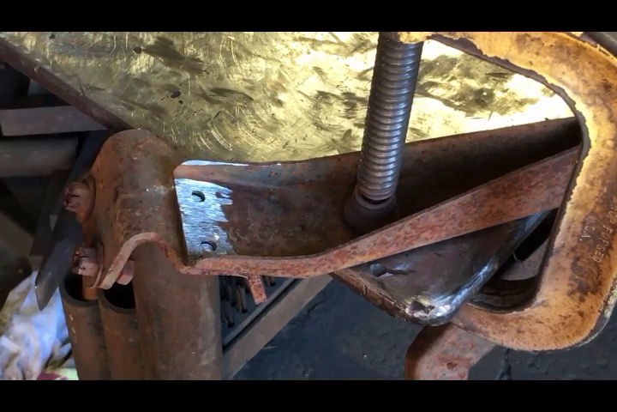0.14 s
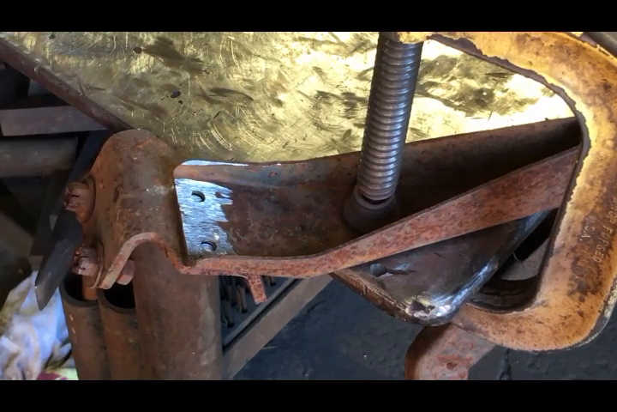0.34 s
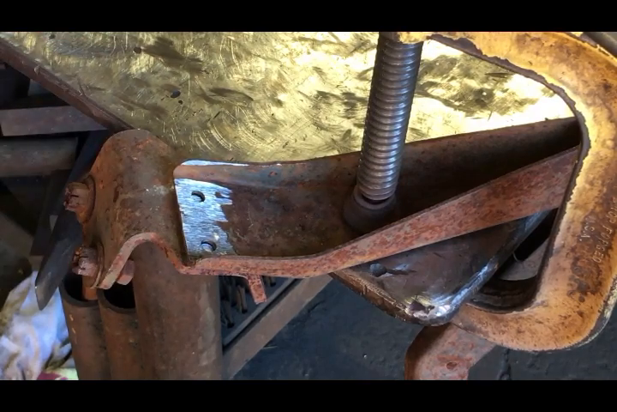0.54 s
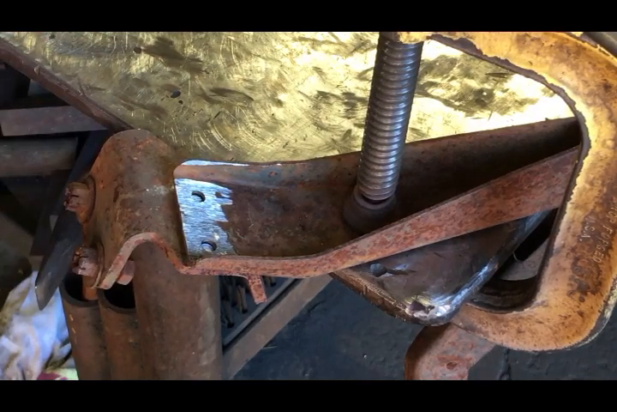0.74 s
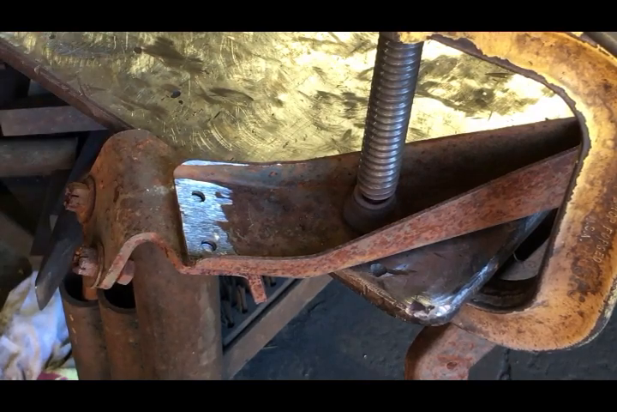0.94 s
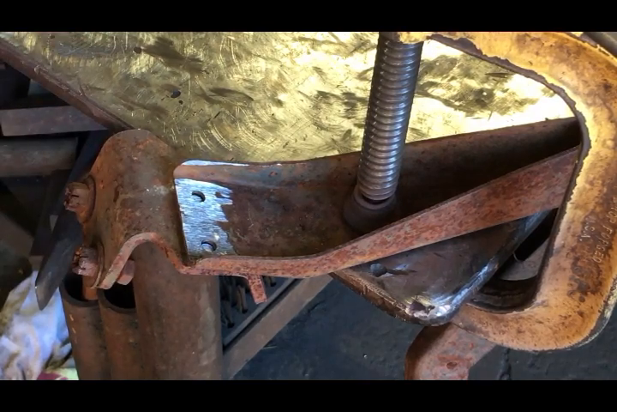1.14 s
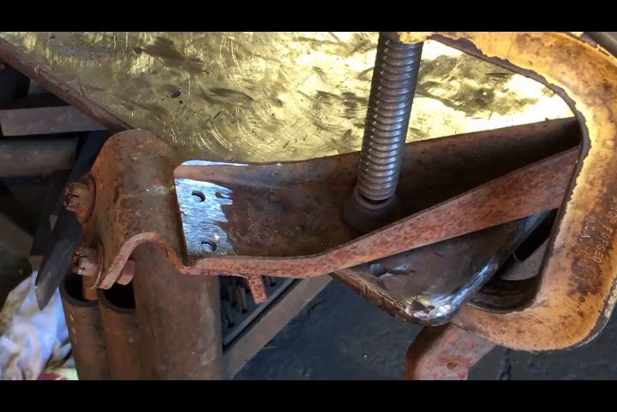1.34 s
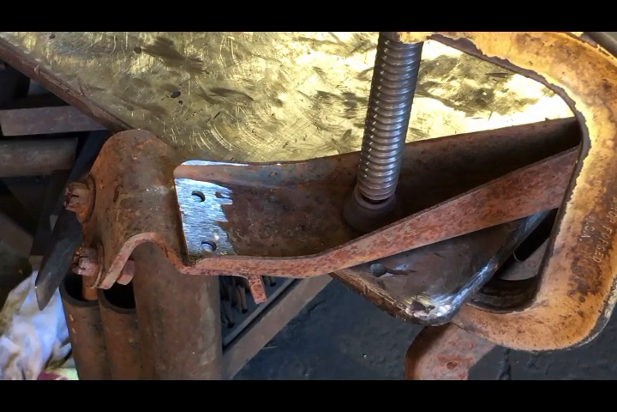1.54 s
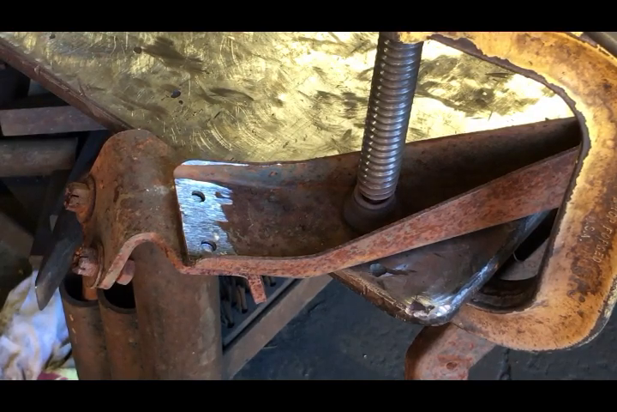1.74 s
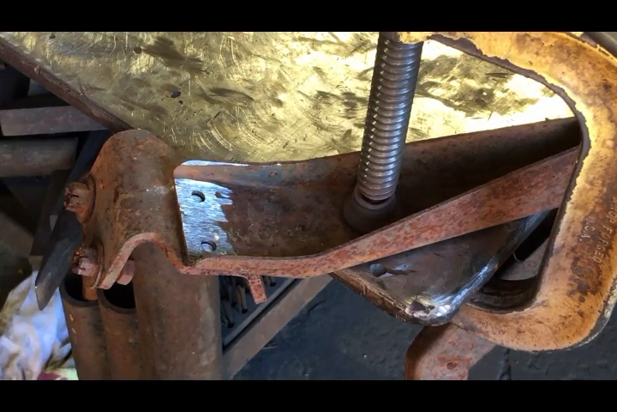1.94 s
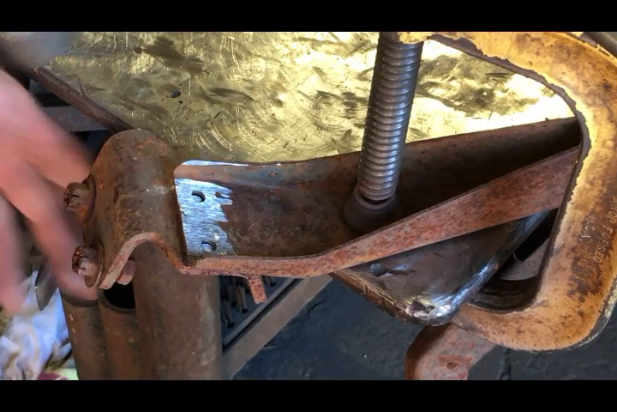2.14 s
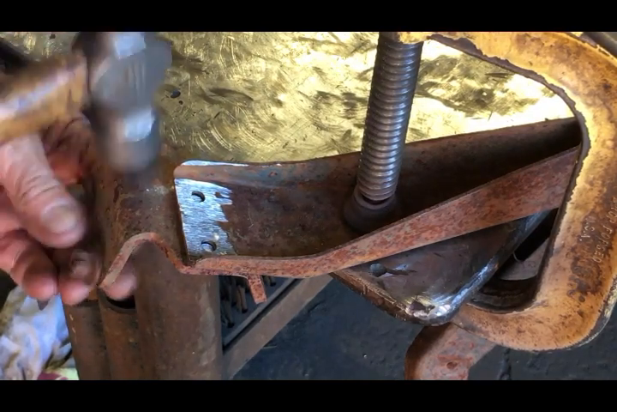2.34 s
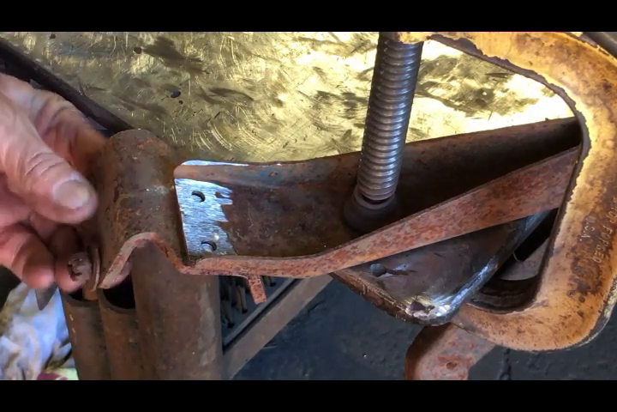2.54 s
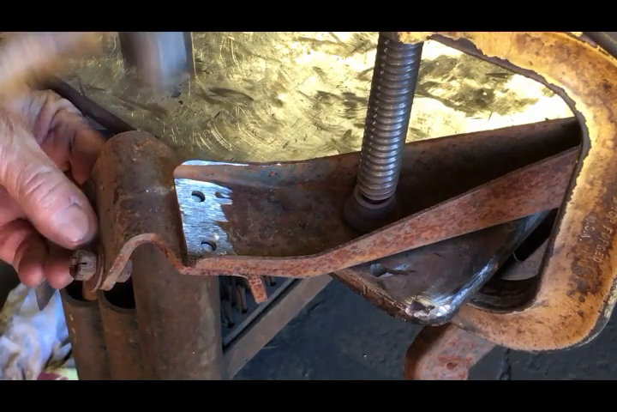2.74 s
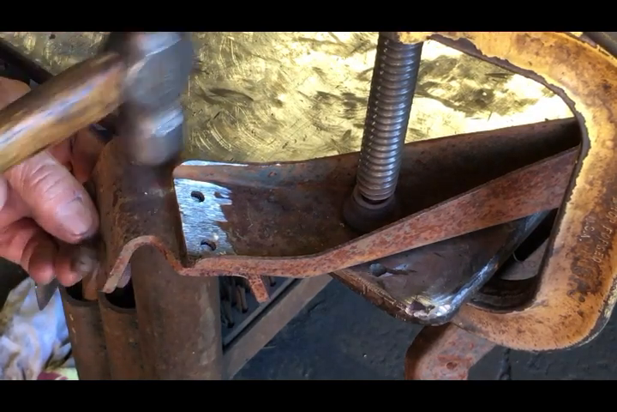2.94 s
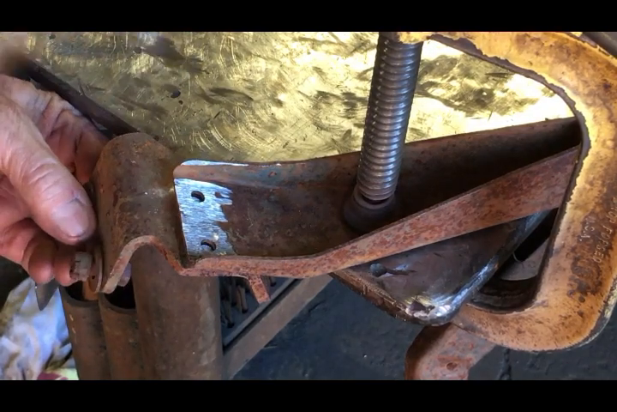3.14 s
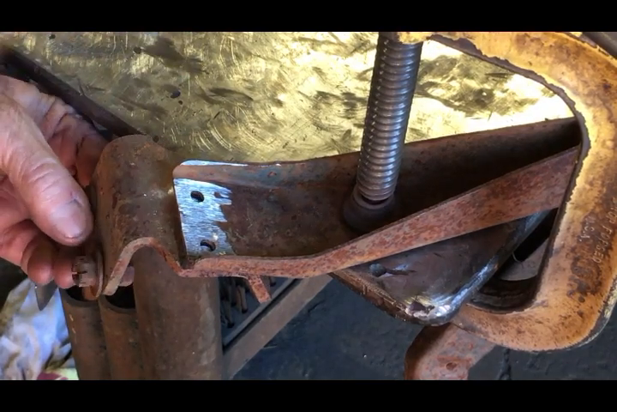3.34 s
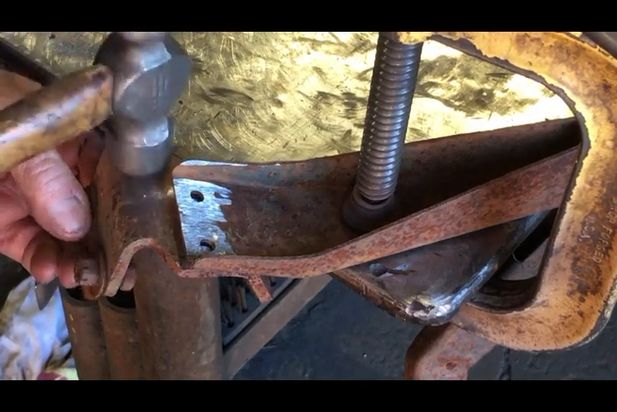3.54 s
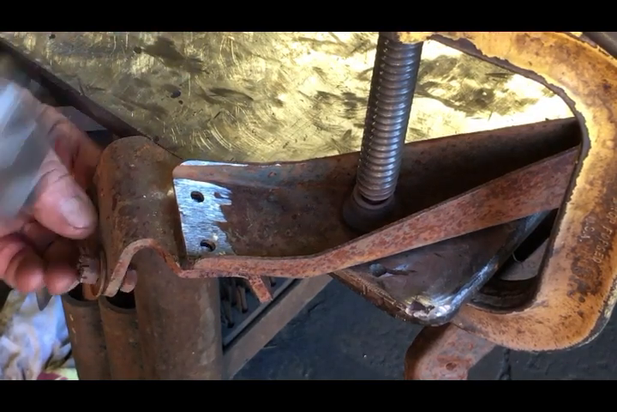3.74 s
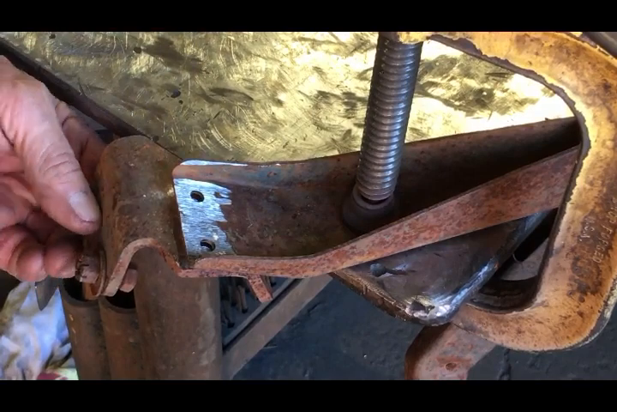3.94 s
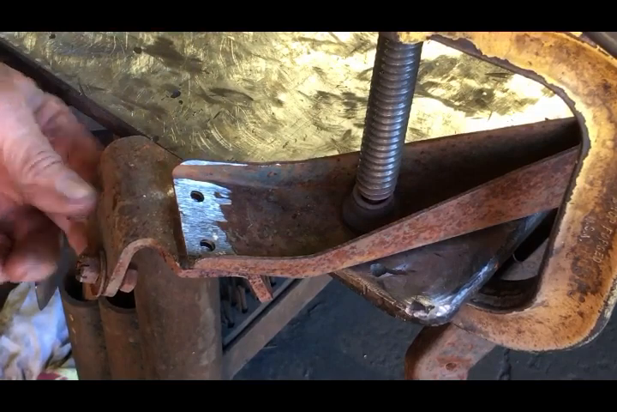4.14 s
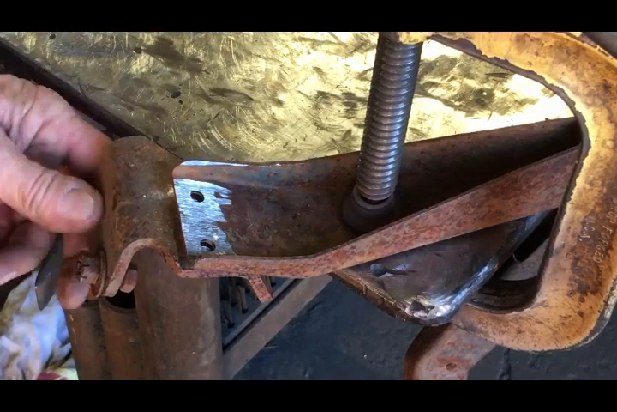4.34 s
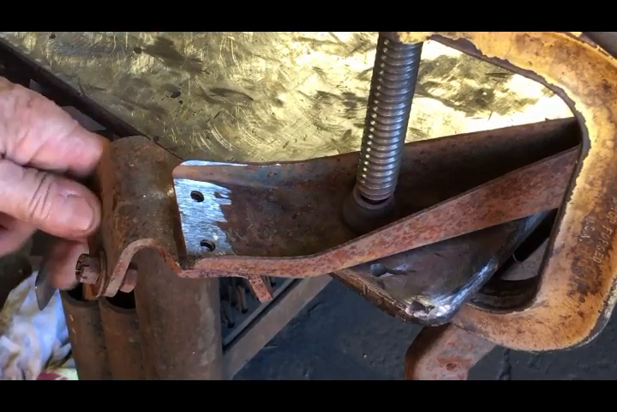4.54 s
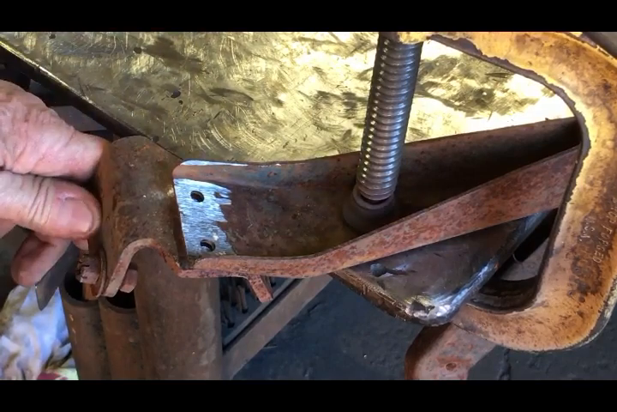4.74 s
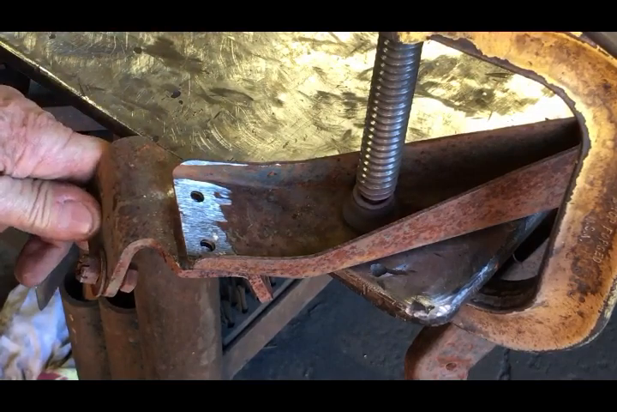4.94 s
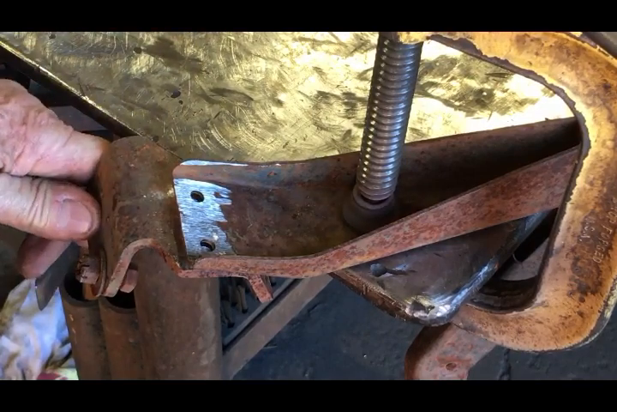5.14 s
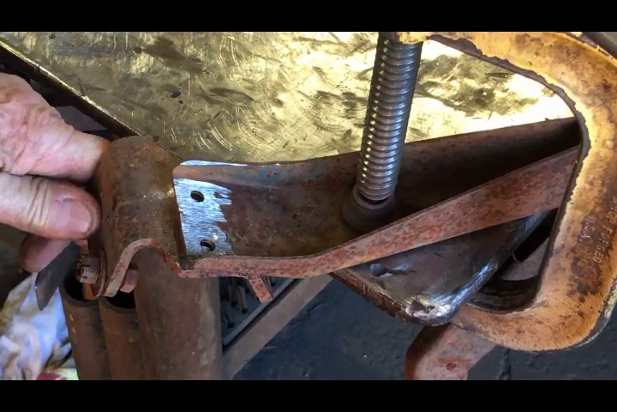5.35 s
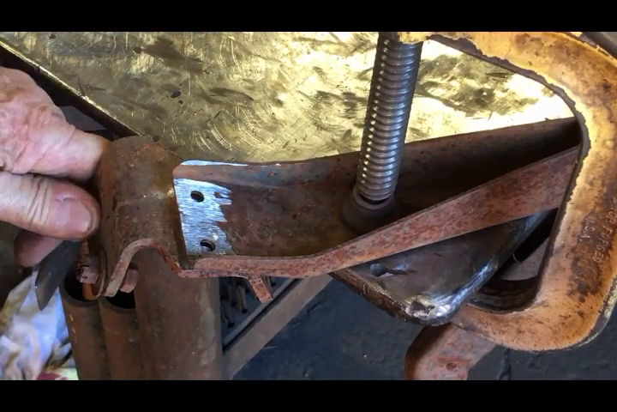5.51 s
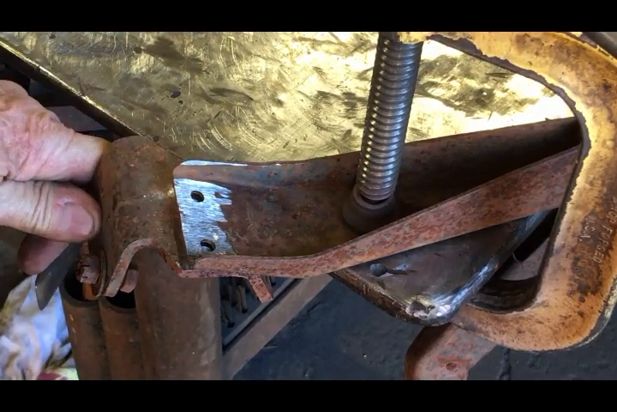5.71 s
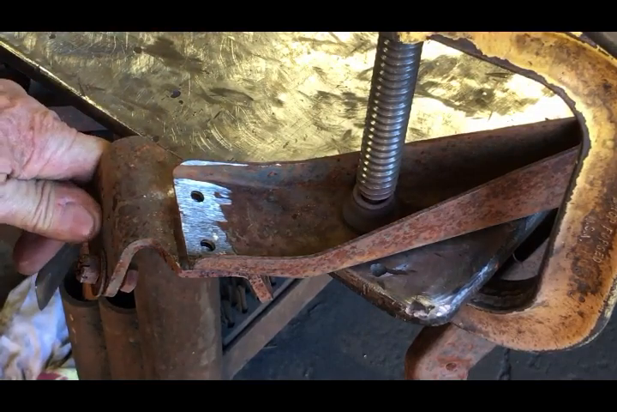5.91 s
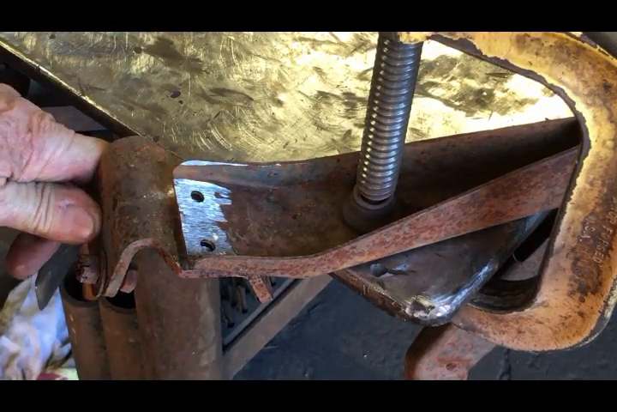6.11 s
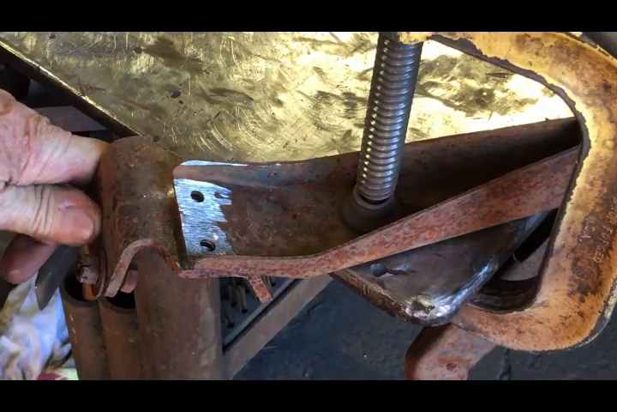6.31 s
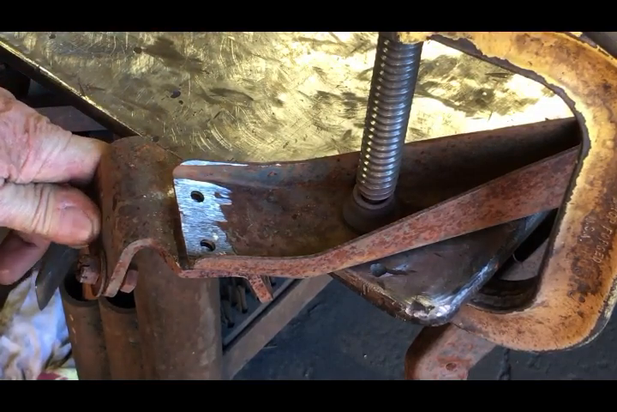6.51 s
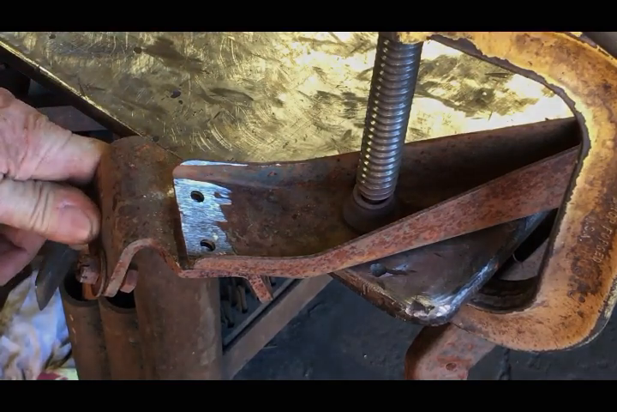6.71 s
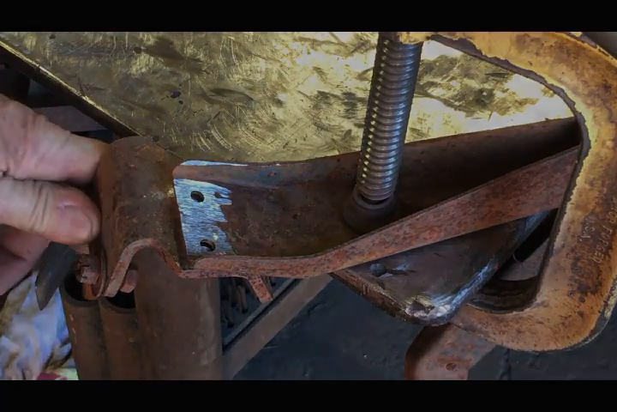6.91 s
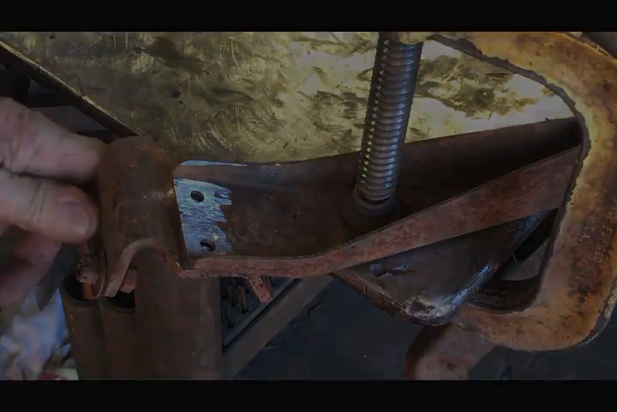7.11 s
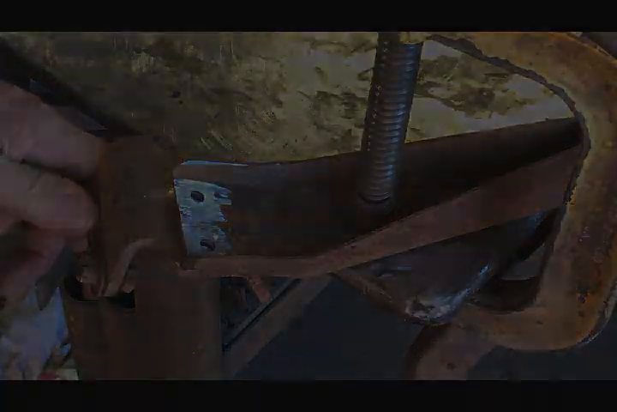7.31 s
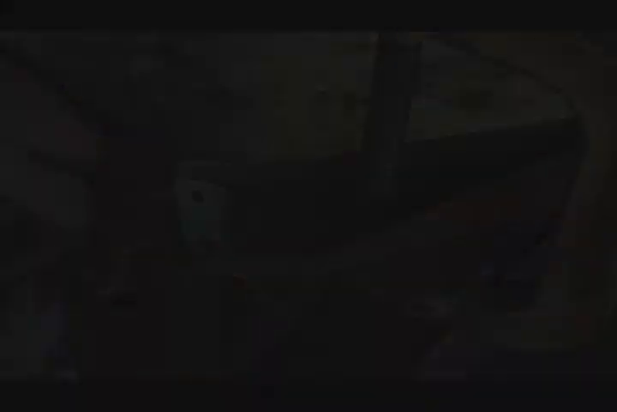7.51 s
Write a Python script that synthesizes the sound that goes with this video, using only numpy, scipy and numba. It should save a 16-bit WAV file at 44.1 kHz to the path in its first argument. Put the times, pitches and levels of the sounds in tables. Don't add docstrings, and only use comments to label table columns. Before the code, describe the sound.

A duct fan hums and rushes steadily in a workshop. A loose steel chisel knocks on the bench, bounces and rings high. Soft finger touches follow, then five loud, evenly spaced hammer blows on a rusty clamped bracket, harsh and rattling, later ones with small rebounds. The metallic ring fades into the room, leaving faint handling and fan hum. Very close phone microphone, slightly limited.

```python
import sys
import numpy as np
from scipy import signal
from scipy.fft import rfft, irfft
from scipy.io import wavfile
from scipy.ndimage import uniform_filter1d, minimum_filter1d
from numba import njit

SR = 44100
rng = np.random.default_rng(int(sys.argv[2]) if len(sys.argv) > 2 else 0)


def wrap_up_sound(samples):
    columns = np.atleast_2d(samples).T
    tamed = np.clip(columns, -1, 1)
    steps = np.round(tamed * 32767).astype(np.int16)
    wavfile.write(sys.argv[1], SR, steps)


def undo_db(level):
    steps = np.asarray(level, float) / 20
    return 10 ** steps


N = 338247


def read(table, hz):
    return np.interp(np.log(hz), np.log(np.array(table)[:, 0]), np.array(table)[:, 1])


def unit(x):
    return x / np.sqrt(np.mean(x ** 2))


def peak_one(x):
    return x / np.sqrt(2 * np.mean(x[:SR // 100] ** 2))


def fade(t, t60):
    return np.exp(-np.log(1000) * t / t60)


def resonate(x, hz, width_hz):
    return signal.lfilter(*signal.iirpeak(min(hz, .45 * SR), hz / max(width_hz, .5), SR), x)


def resonate_twice(x, hz, width_hz, second_width_hz):
    return resonate(resonate(x, hz, width_hz), hz, second_width_hz)


def fading_noise(colour, t60, length, rise_cycles):
    bands_hz = 220 * 2 ** np.arange(0, 6.3, 1 / 3)
    t = np.arange(int(length * SR)) / SR
    out = np.zeros(len(t))
    for hz in bands_hz:
        rise = (1 - np.exp(-t * hz / rise_cycles)) ** 2
        burst = rng.standard_normal(len(t)) * rise * fade(t, t60(hz))
        out += undo_db(colour(hz)) * resonate_twice(burst, hz, hz / 3, hz / 3)
    return out


def coloured(spectrum, db):
    hz = np.maximum(np.fft.rfftfreq(N, 1 / SR), 1)
    return undo_db(db) * unit(irfft(rfft(rng.standard_normal(N)) * undo_db(read(spectrum, hz)), N))


def add(out, s, sound):
    i = int(s * SR)
    out[i:i + len(sound)] += sound[:N - i]


def narrow_noises(table):
    out = np.zeros(N)
    for hz, width_hz, db in table:
        out += undo_db(db) * unit(resonate_twice(rng.standard_normal(N), hz, width_hz, 3 * width_hz))
    return out


def slow_noise(span):
    return unit(uniform_filter1d(uniform_filter1d(rng.standard_normal(N), span), span))


def fan(swell_db=0.66, flutter_db=0.85):
    # f/Hz, level per Hz/dB
    air = [(12, -59.5), (20, -31.5), (70, -3.5), (157, -2), (202, -10), (259, -12), (309, -7.5), (436, -17),
           (471, -6), (499, -18.5), (540, -15.5), (594, -20.5), (1080, -23.5), (2000, -37), (2600, -70.5),
           (4400, -120)]
    # f/Hz, level per Hz/dB
    hiss = [(1180, -31), (2000, -1.5), (2460, -4), (3370, -6.5), (4990, -12), (5540, -11.5), (7700, -16.5),
            (10900, -17.5), (12700, -23), (14400, -18), (16000, -25.5)]
    # f/Hz, width/Hz, level/dB
    duct = [(79.5, 10, -43), (108.5, 9.5, -43), (149.8, 5.2, -47.5), (172.6, 12, -42), (229.8, 12, -49),
            (297, 30, -46), (535.6, 28, -55.5)]
    # f/Hz, width/Hz, level/dB
    whine = [(471.1, 2.6, -45.5), (951, 4, -62), (10760, 30, -86.5), (14260, 30, -88.5)]
    unsteady = undo_db(swell_db * slow_noise(SR // 5) + flutter_db * slow_noise(SR // 25))
    rush = narrow_noises(duct) + coloured(air, -35)
    return unsteady * rush + narrow_noises(whine) + coloured(hiss, -58.5)


def shop(x, gap_s=.012):
    # f/Hz, t60/s
    room_t60 = [(200, 0.68), (1000, .9), (4000, 0.92), (9000, .48), (15000, 0.13)]
    tail = fading_noise(lambda hz: -1.0 * np.log2(hz / 1000), lambda hz: read(room_t60, hz),
                        length=1.2, rise_cycles=6.7)
    tail = np.append(np.zeros(int(gap_s * SR)), tail / np.sqrt(np.sum(tail ** 2)))
    return signal.fftconvolve(x, tail)[:N]


def brushes(grain_db=0.0):
    # t/s, length/s, level/dB, f/Hz, width/Hz
    strokes = [(1.058, 0.14, -60, 7000, 12000), (1.471, 0.15, -56, 1980, 3000),
               (3.948, 0.032, -46, 2500, 5000), (4.289, .035, -58, 5500, 2990),
               (4.39, 0.033, -58, 3800, 2500), (4.455, 0.024, -62, 5000, 2000),
               (7.578, 0.1, -47.5, 1990, 4950), (7.591, .15, -32, 45, 40), (7.633, .1, -51, 2670, 200),
               (7.62, .1, -62, 6000, 1200)]
    out = np.zeros(N)
    for s, length, db, hz, width_hz in strokes:
        n = int(length * SR)
        grain = undo_db(grain_db * unit(uniform_filter1d(rng.standard_normal(n), 120)))
        rub = unit(resonate(grain * rng.standard_normal(n), hz, width_hz))
        add(out, s, undo_db(db) * signal.windows.tukey(n, .6) * rub)
    return out


def scrape(start_s=1.48, end_s=1.69, level_db=-57):
    # f/Hz, width/Hz, level/dB
    tool = [(2010, 140, 2.5), (3082, 36, -8.5), (3300, 49, -8.5), (4375, 90, -11.5), (5450, 57.2, -12.5),
            (6530, 120, -10)]
    n = int((end_s - start_s) * SR)
    rub = rng.standard_normal(n) * signal.windows.tukey(n, .3)
    out = np.zeros(N)
    add(out, start_s, undo_db(level_db) * unit(sum(undo_db(db) * unit(resonate(rub, hz, w)) for hz, w, db in tool)))
    return out


def ticks(width_hz=6500):
    # t/s, peak level/dB, f/Hz, t60/s, share of bracket ring/dB
    touches = [(1.1553, -46.5, 5500, 0.019, -18.5), (2.3325, -30.5, 2997, 0.073, 1.5),
               (2.356, -30, 2805, 0.069, 2), (2.630, -36, 11500, 0.033, -11),
               (2.642, -47.5, 10000, .015, -14), (2.912, -41, 11000, 0.046, -4),
               (3.197, -45, 11020, 0.014, -11), (3.467, -42.5, 8500, 0.092, -2.5),
               (3.6918, -30, 9400, 0.016, 0), (4.766, -51.5, 6000, 0.015, -25)]
    out, t = np.zeros(N), np.arange(int(.2 * SR)) / SR
    for s, peak_db, hz, t60, ring_db in touches:
        burst = rng.standard_normal(len(t)) * fade(t, t60)
        ring = resonate(bracket(burst, spot_db=2.5), hz, 2 * width_hz)
        click = resonate_twice(burst, hz, width_hz, 2 * width_hz)
        add(out, s, undo_db(peak_db) * (peak_one(click) + undo_db(ring_db) * peak_one(ring)))
    return out


def hammer_head(hz=13350, width_hz=300):
    # t/s, peak level/dB, t60/s
    pings = [(2.361, -45, .1), (2.39, -22, .22)]
    out, t = np.zeros(N), np.arange(int(.2 * SR)) / SR
    for s, peak_db, t60 in pings:
        burst = rng.standard_normal(len(t)) * fade(t, t60)
        add(out, s, undo_db(peak_db) * peak_one(resonate_twice(burst, hz, width_hz, 2 * width_hz)))
    return out


def bench():
    # t/s, peak level/dB, t60/s, shine above 6 kHz/dB per octave
    knocks = [(1.6813, -21.5, .12, -3), (1.6912, -13, 0.1, -1), (1.7004, -15, 0.21, 1.5),
              (1.7792, -24.5, 0.074, -1.5), (1.7912, -15, 0.16, -2), (1.8475, -22, .17, -4),
              (1.8735, -28, 0.24, -1.5), (1.9045, -30.5, .18, -12)]
    # f/Hz, level per Hz/dB
    wood = [(240, -45.5), (400, -17.5), (1160, -7.5), (2430, -17), (2670, -12), (6240, -14), (6850, -14.5),
            (11200, -18), (13700, -17), (16000, -31.5)]
    out, t = np.zeros(N), np.arange(400) / SR
    for s, peak_db, t60, shine_db in knocks:
        colour = lambda hz: read(wood, hz) + shine_db * max(np.log2(hz / 6000), 0)
        knock = fading_noise(colour, lambda hz: t60 * (3000 / hz) ** 0.16, length=0.32, rise_cycles=2.5)
        edge = resonate(rng.standard_normal(len(t)) * np.exp(-t / .0015), 11000, 9000.0)
        add(out, s, undo_db(peak_db) * peak_one(knock))
        add(out, s, undo_db(peak_db + 2.0) * edge)
    return out


def chisel(turn_hz=3.0, twin_t60_s=0.94, contact_s=0.0027):
    # t/s, level/dB left in second bend flatwise, edgewise, third bend flatwise, edgewise
    bounces = [
        (1.683, -32.5, -32, -31.5, -48),
        (1.692, -11.5, -14.5, -17, -5.5),
        (1.792, -36.5, -14.5, -11, -9),
        (1.848, -18.5, -17.5, -17, -22.5),
        (1.875, -17, -12, -17, -22),
        (1.908, -31.5, -23, -20.5, -27.5),
    ]
    # f/Hz, twin f/Hz, twin level/dB
    modes = [
        (6636, 6674, -18),
        (7078, 7110, -20),
        (2616, 2672, -10),
        (11822, 11853, -18),
        (13391, 13360, -16),
    ]
    # t60 in the air/s, quiet side faces the phone at t/s, for +- s, depth/dB, t60 at rest/s
    turning = [(.9, 1.691, 0.013, -13.5, .3), (.5, 1.79, .04, -22, .25), (3, 1.68, 0.06, -16, 0.47),
               (.6, 1.767, 0.033, -22, .25), (0.54, 1.715, .022, -25.5, .35)]
    rest_s, rock_db, rock_s = 1.93, 5, .012
    flash_db, flash_s = 3.5, 0.01193
    caught_s, caught_t60_s = 1.875, .3

    t, rows, out = np.arange(N) / SR, np.array(bounces), np.zeros(N)
    start = rows[0, 0]
    last = np.maximum(np.searchsorted(rows[:, 0], t) - 1, 0)
    since = np.abs(t - rows[last, 0])
    rested = np.maximum(t - rest_s, 0)
    caught_db = -7 - 60 * (np.minimum(t, rest_s) - caught_s) / caught_t60_s
    first = -17.5 + (t > caught_s) * caught_db
    flat2, edge2, flat3, edge3 = rows[last, 1:].T
    turns = np.arange(start, rest_s + .1, .02)
    for struck_db, mode, turn in zip((flat2, edge2, first, flat3, edge3), modes, turning):
        hz, twin_hz, twin_db = mode
        t60, quiet_s, span_s, depth_db, rest_t60 = turn
        bend = turn_hz * np.interp(t, turns, rng.standard_normal(len(turns)))
        rock = np.interp(rested / rock_s, np.arange(80), np.append(0, rng.standard_normal(79)))
        onset = np.clip((t - start) * 1000 + 1, 0, 1)
        lying = undo_db(rock_db * rock - 60 * rested / rest_t60) * onset
        db = struck_db + flash_db * np.exp(-since / flash_s) - 60 * since / t60
        db = uniform_filter1d(db, size=int(contact_s * SR) + 1)
        facing = np.clip(np.abs(t - quiet_s) / span_s, undo_db(depth_db), 1)
        out += undo_db(db) * facing * lying * np.sin(2 * np.pi * np.cumsum(hz + bend) / SR)
        twin = undo_db(twin_db + struck_db.max()) * fade(np.abs(t - start), twin_t60_s) * lying
        out += twin * np.sin(2 * np.pi * np.cumsum(twin_hz + bend) / SR)
    return out


def bracket(push, tilt=lambda hz: 0, spot_db=1.5):
    # f/Hz, width/Hz, level/dB
    modes = [(541, 39, -11), (918, 28, -5.5), (1080, 43, -1.5), (1150, 70, -4.5), (2286, 78, -1),
             (3020, 73, -9), (4210, 80, -6), (4480, 250, -8.5), (5180, 180, -7.5), (5510, 90, -13.5),
             (7790, 130, -2), (8130, 86, -8.5), (8360, 66.7, -7.5), (9360, 50, -5.5), (9620, 91.2, -7),
             (10800, 78, -10.5), (11800, 120, -8), (13100, 210, -19.5)]
    out = np.zeros(len(push))
    for hz, width_hz, db in modes:
        strength = undo_db(db + tilt(hz) + spot_db * rng.standard_normal())
        out += strength * resonate(push, hz, width_hz) * np.sqrt(1000 / width_hz)
    return out


def clamp_ring(t):
    # f/Hz, width/Hz, level/dB
    clusters = [(1050, 120, -1.5), (1690, 80, -9.5), (2232, 25, -9.5), (2670, 113.6, -6.5),
                (4170, 90, -6.5), (4500, 250, -16.5), (5510, 100, -7), (7740, 84, -8.5), (9000, 78, -17),
                (9760, 107, -14.5), (10800, 63, -25.5), (13300, 64, -33)]
    # f/Hz, t60/s
    ring_t60 = [(500, 0.57), (2300, 0.43), (6000, .5), (13000, 0.253)]
    out = np.zeros(len(t))
    for hz, width_hz, db in clusters:
        beating = unit(resonate(rng.standard_normal(len(t)), hz, 1.8 * width_hz))
        out += undo_db(db) * beating * fade(t, read(ring_t60, hz))
    return out


def bench_thud(t, thud_s=0.0067):
    # f/Hz, width/Hz, level/dB
    boards = [(70, 50, 3), (110, 51.2, -3), (180, 74.3, 18), (298.7, 153, 3), (510, 148, 6.5)]
    push = (1 + 1.9 * rng.standard_normal(len(t))) * t / thud_s * np.exp(-t / thud_s)
    thud = sum(undo_db(db) * resonate_twice(push, hz, w, 2 * w) for hz, w, db in boards)
    return thud / np.abs(thud).max()


def phone_jolt(t, hz=70, late_s=0.022, length_s=.007):
    return np.cos(2 * np.pi * hz * (t - late_s)) * np.exp(-((t - late_s) / length_s) ** 2)


def hammer(chatter_s=0.00572, crack_s=.0012, modes_db=-0.5, clamp_db=-18.5):
    # t/s, peak level/dB, then against the peak body/dB, shine/dB, crack/dB
    blows = [
        (2.3854, -2.5, -0.5, 3, -8),
        (2.6530, -3, 1, 4, -8),
        (2.9345, -3.5, 0, 2.5, 10),
        (2.9777, -14.5, -2.5, -5, 10),
        (3.2194, -4.5, 2, 2.5, 1),
        (3.2630, -15.5, -4, -11, 1),
        (3.4907, -4, 2, 2.5, -3.5),
        (3.5287, -14.5, 2, 2, 13),
    ]
    # f/Hz, level per Hz/dB
    clank_colour = [(150, -41.5), (250, -19), (476, -3), (651, -24), (890, -2), (1450, -14), (2200, -1.5),
                    (2530, -9), (4340, -9), (6820, -17.5), (9490, -11), (13400, -25.5), (16000, -27)]
    # f/Hz, t60/s
    clank_t60 = [(300, 0.21), (1000, .12), (3000, 0.14), (8000, .085), (15000, .065)]
    out, t = np.zeros(N), np.arange(int(.6 * SR)) / SR
    for s, peak_db, body_db, shine_db, crack_db in blows:
        tilt = lambda hz: np.interp(np.log(hz), np.log([1000, 3500, 10000]), [body_db, 0, shine_db])
        clank = fading_noise(lambda hz: read(clank_colour, hz) + tilt(hz), lambda hz: read(clank_t60, hz),
                             length=.6, rise_cycles=2.3)
        crack = resonate(np.sign(rng.standard_normal(len(t))) * np.exp(-t / crack_s), 5995, 11000.0)
        rattle = np.exp(-t / crack_s) + 1.2 * t / chatter_s * np.exp(1 - t / chatter_s)
        chatter = rng.standard_normal(len(t)) ** 3 * rattle
        modes = peak_one(bracket(chatter, tilt))
        blow = peak_one(clank) + undo_db(modes_db) * modes + undo_db(clamp_db) * clamp_ring(t)
        blow += undo_db(crack_db) * crack
        blow += undo_db(-9.5 + 0.55 * peak_db) * bench_thud(t)
        add(out, s, undo_db(peak_db) * blow)
        add(out, s, undo_db(-26 + body_db + 2 * peak_db) * phone_jolt(t))
    return out


def scene():
    fingers = ticks() + brushes() + scrape()
    heavy = hammer() + hammer_head() + bench() + fingers
    ring = chisel()
    to_walls = undo_db(-17.0) * heavy + undo_db(-20.0) * resonate_twice(ring, 8000, 7000.0, 7000.0)
    return (heavy + ring + shop(to_walls) + fan())[None]


@njit
def follow(x, attack, release):
    y, e = np.empty(len(x)), 0.
    for i in range(len(x)):
        e += (x[i] - e) * (attack if x[i] > e else release)
        y[i] = e
    return y


def top_cut(x):
    return signal.sosfilt(signal.butter(12, 16800, fs=SR, output="sos"), x)


def record(dry, knee_db=-25.5, squeeze=0.31, hold_s=0.15, release_s=.05, top=0.94, limit_s=0.0052):
    hold = int(hold_s * SR)
    level = follow(np.abs(dry[0]), 1 / (0.0076 * SR), 1 / (0.0077 * SR))
    recent = np.roll(-minimum_filter1d(-level, size=hold), hold // 2)
    held = follow(recent, 1 / (0.025 * SR), 1 / (release_s * SR))
    x = dry[0] * np.minimum(undo_db(knee_db) / (held + 1e-9), 1) ** squeeze * undo_db(1.22)
    crest = follow(-minimum_filter1d(-np.abs(x), size=45), 0.99, 1 / (limit_s * SR))
    x = x * uniform_filter1d(np.minimum(top / (crest + 1e-9), 1), size=21)
    x = signal.sosfilt(signal.ellip(8, .2, 60, 15800, fs=SR, output="sos"), x)
    x = signal.sosfilt(signal.butter(2, 30, "high", fs=SR, output="sos"), x)
    return top_cut(np.clip(x, -1, 1)[None])


dry = scene()
out = record(dry)
wrap_up_sound(out)
```